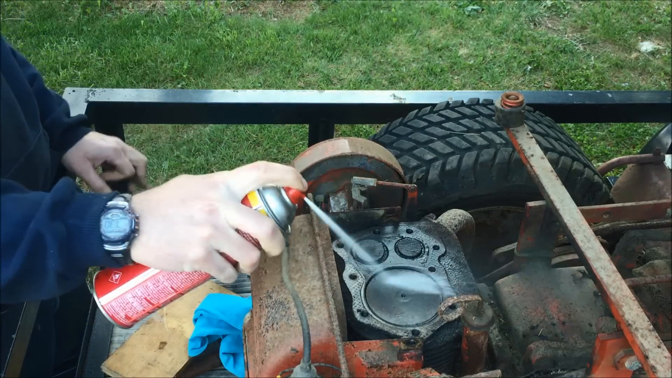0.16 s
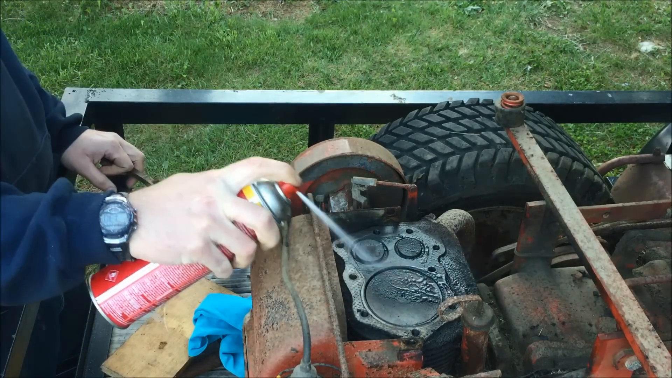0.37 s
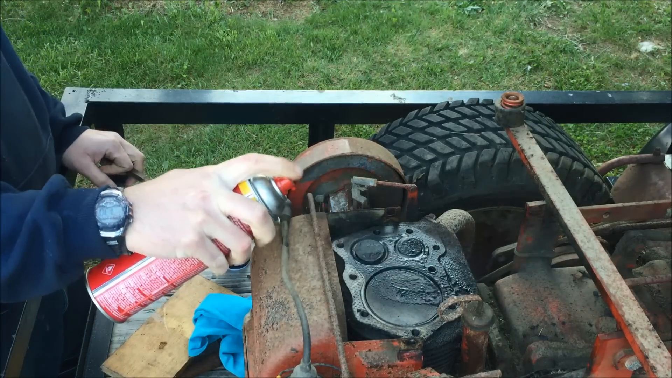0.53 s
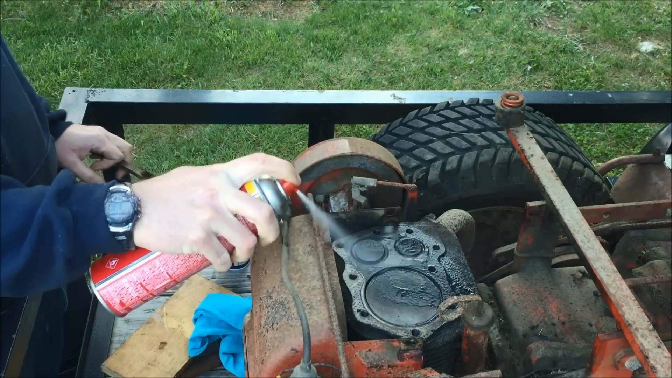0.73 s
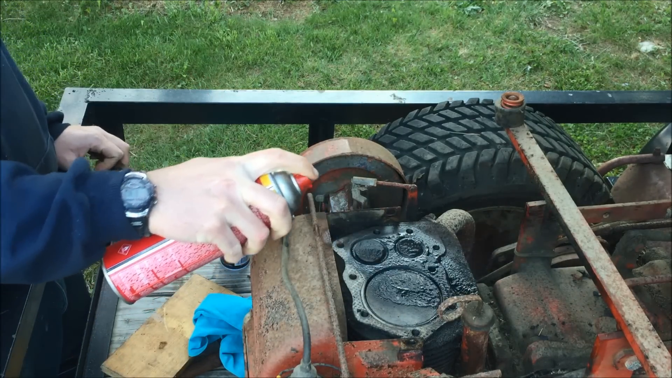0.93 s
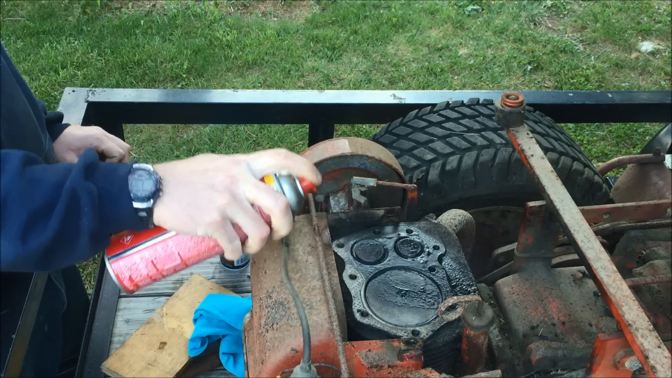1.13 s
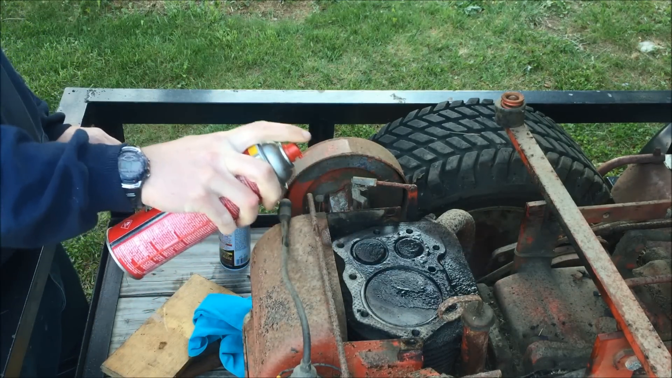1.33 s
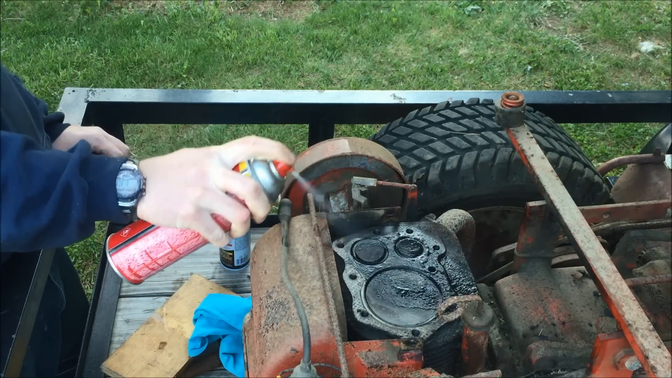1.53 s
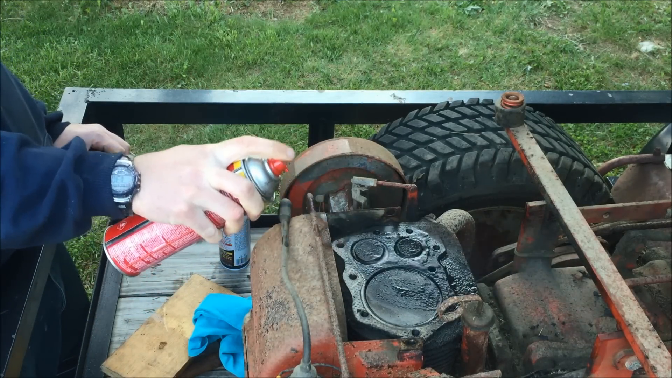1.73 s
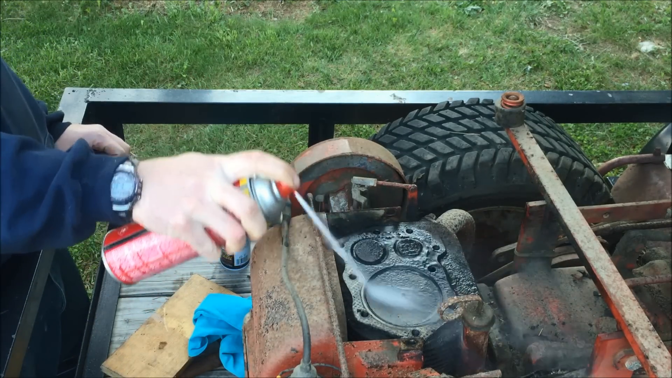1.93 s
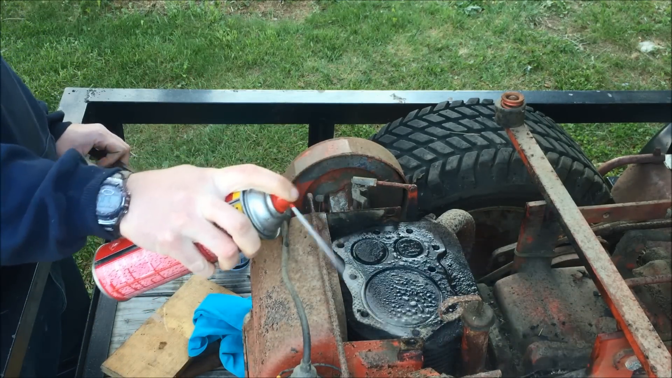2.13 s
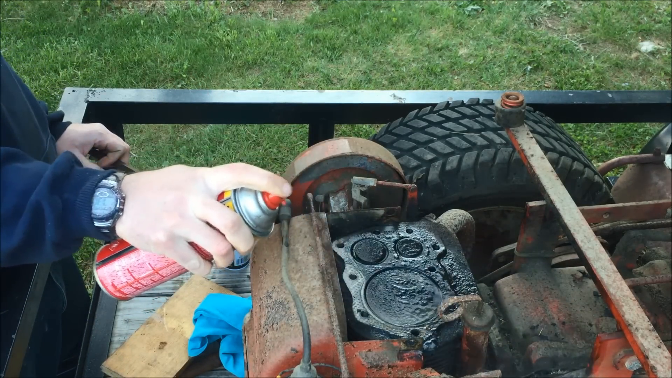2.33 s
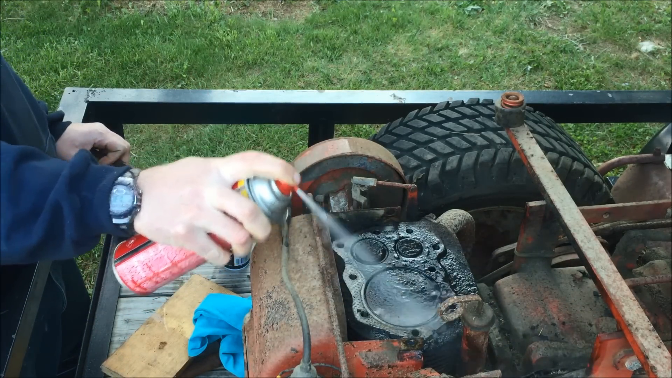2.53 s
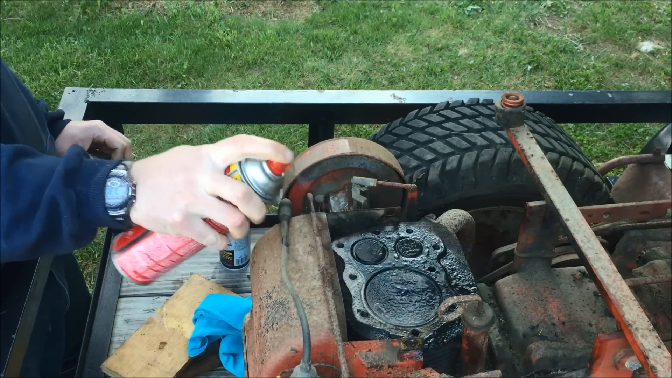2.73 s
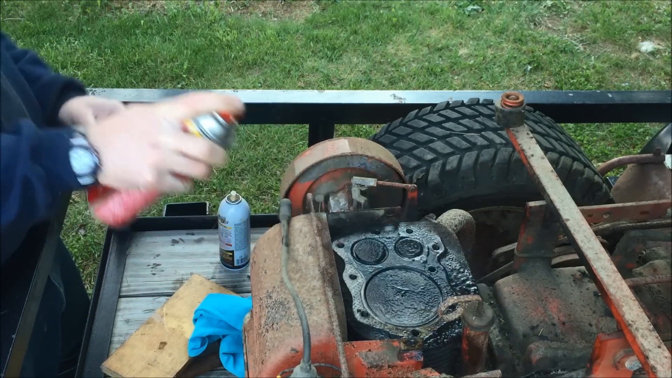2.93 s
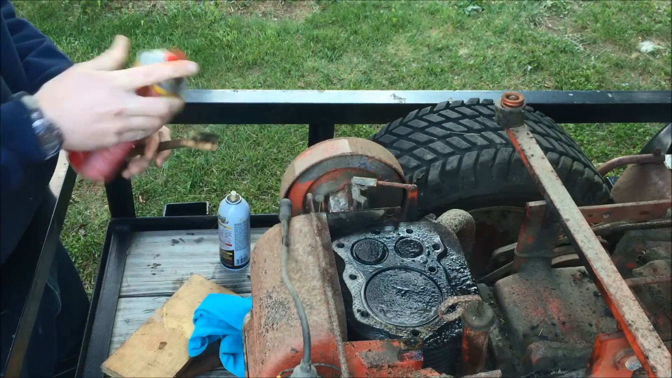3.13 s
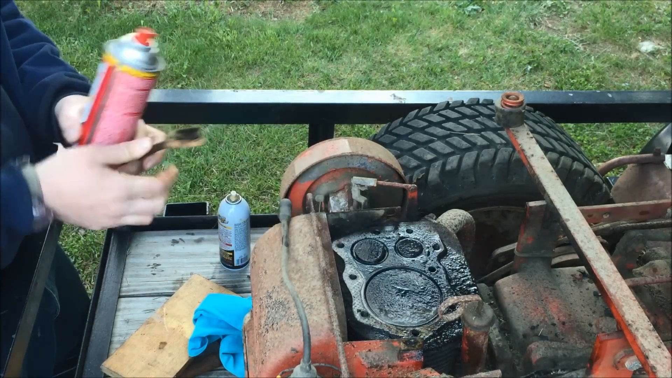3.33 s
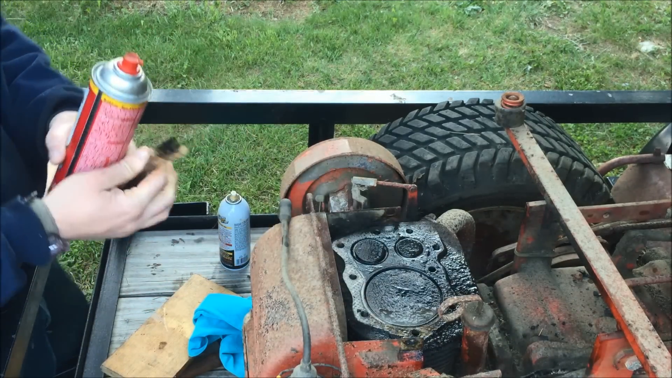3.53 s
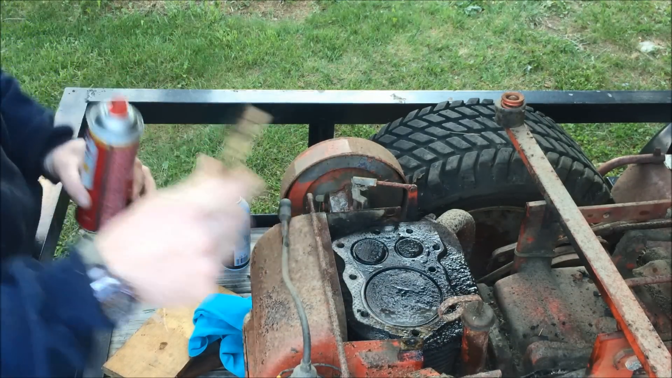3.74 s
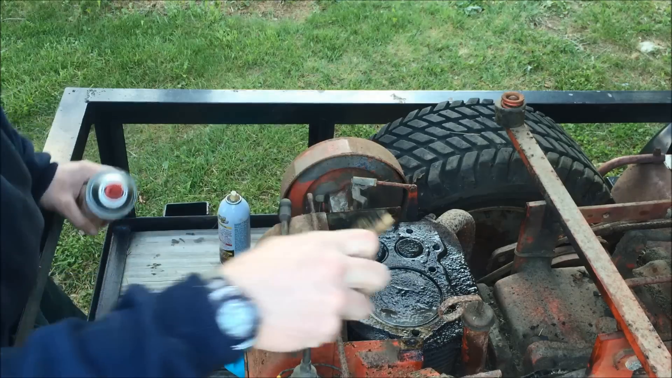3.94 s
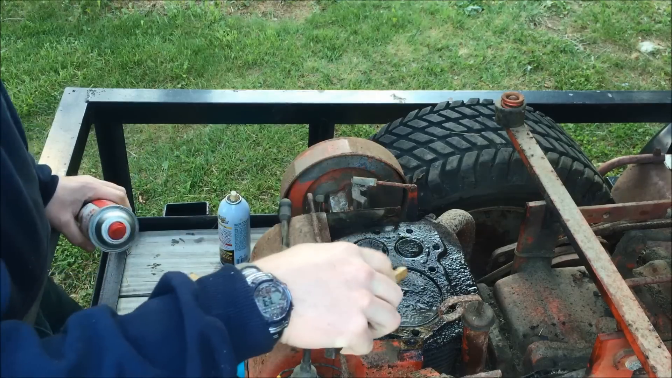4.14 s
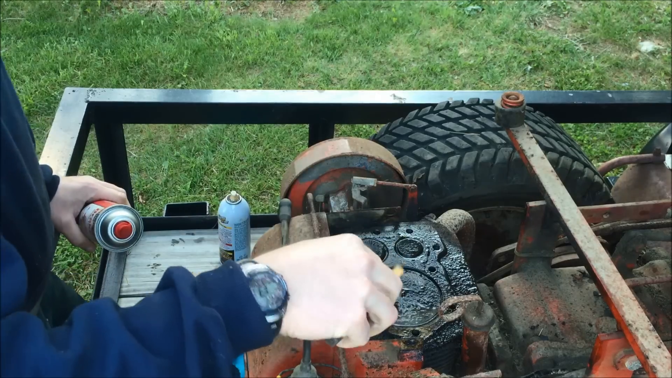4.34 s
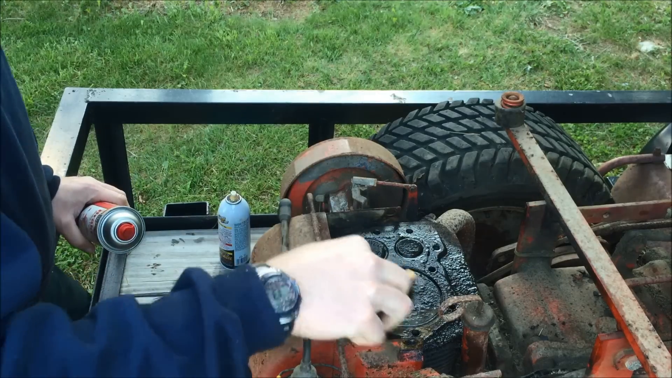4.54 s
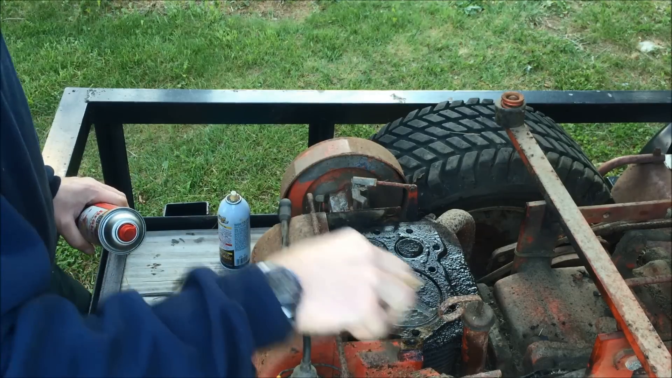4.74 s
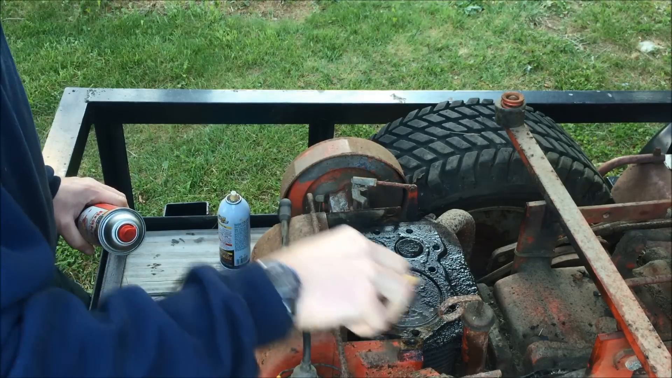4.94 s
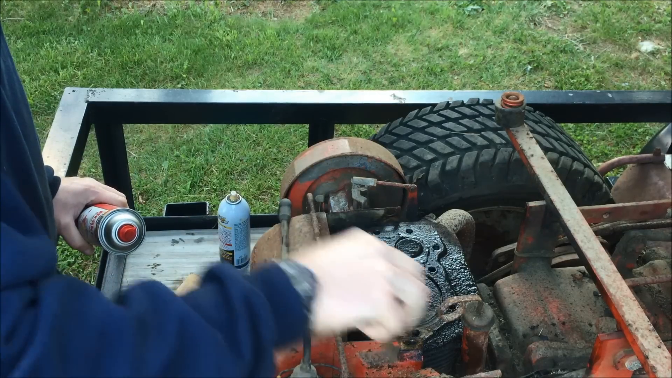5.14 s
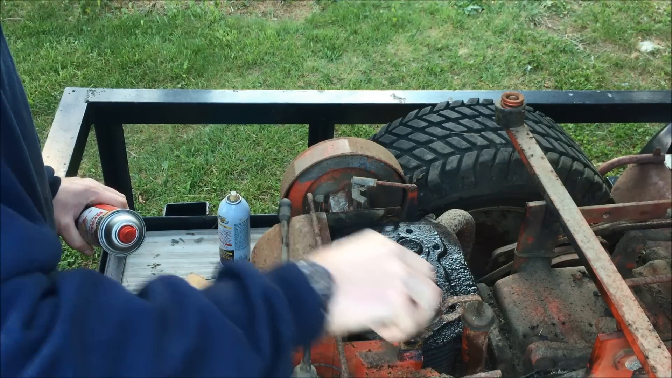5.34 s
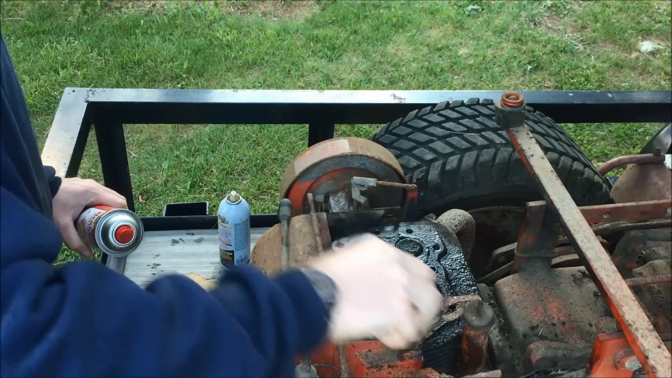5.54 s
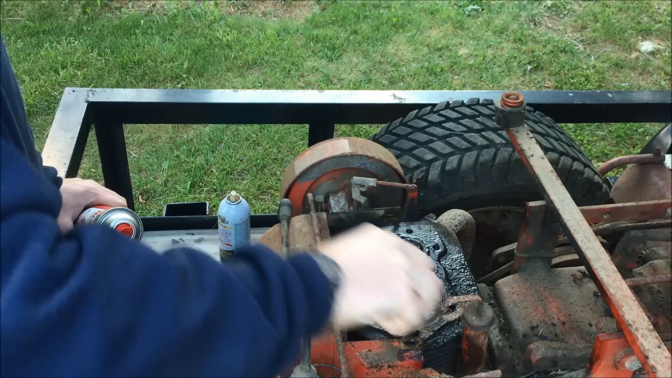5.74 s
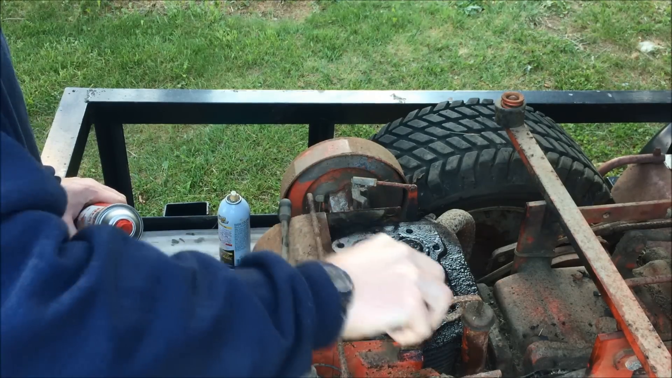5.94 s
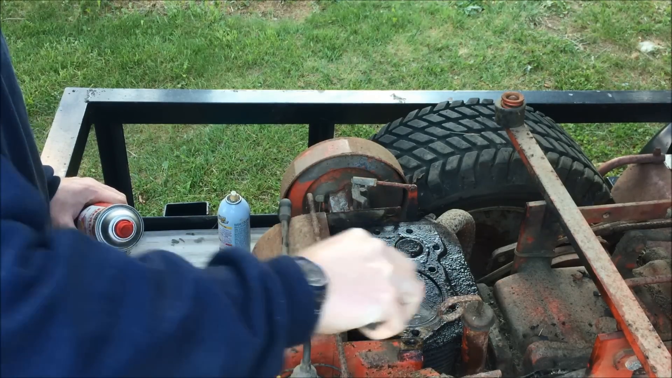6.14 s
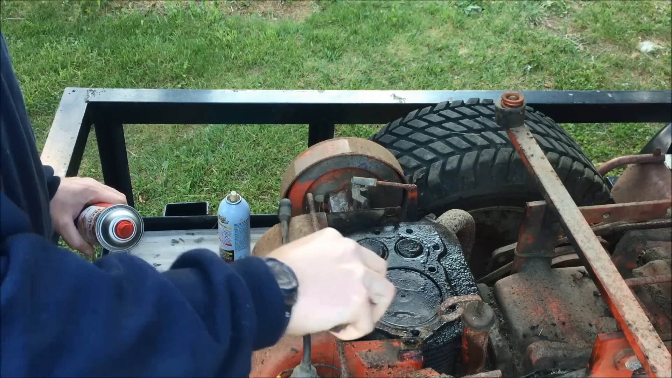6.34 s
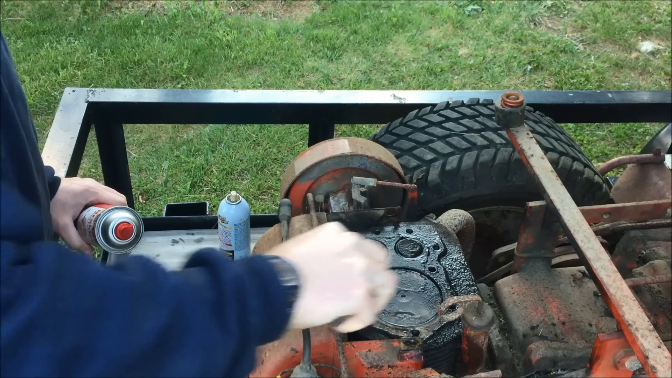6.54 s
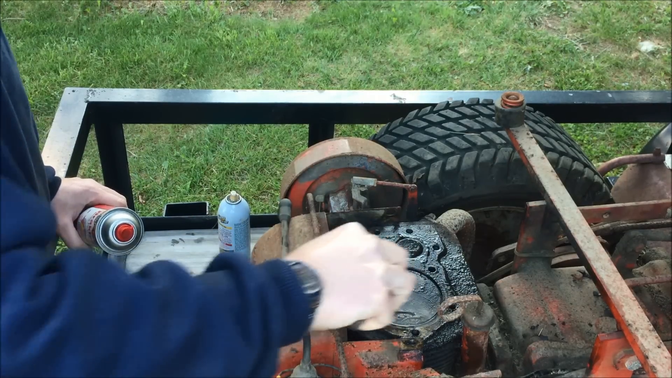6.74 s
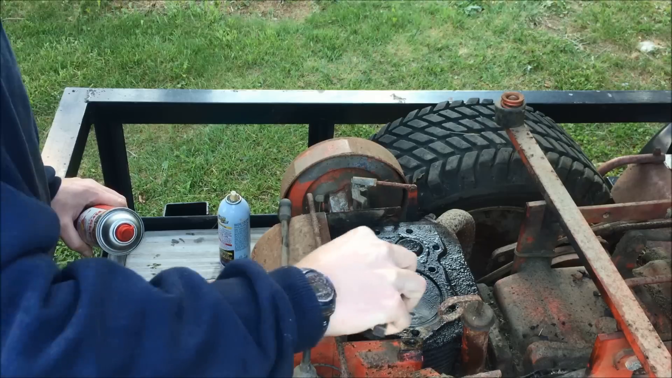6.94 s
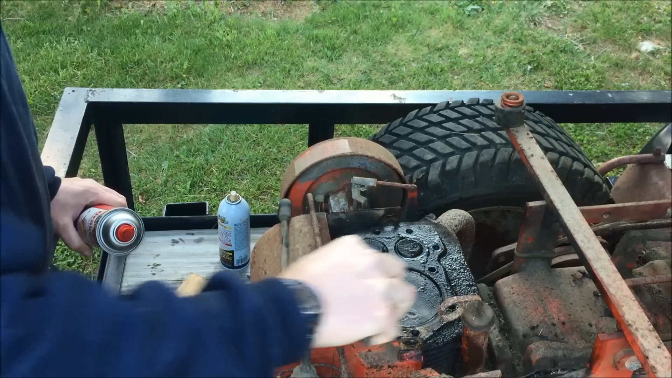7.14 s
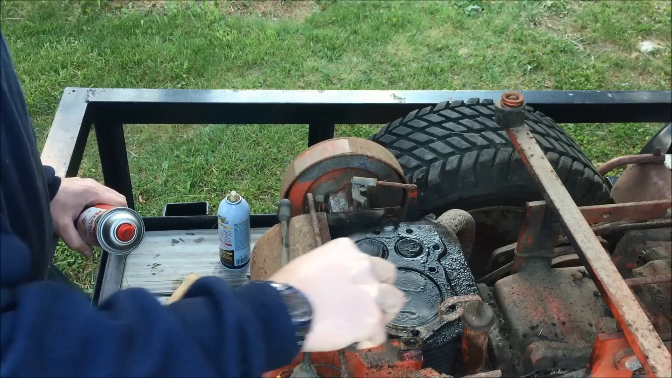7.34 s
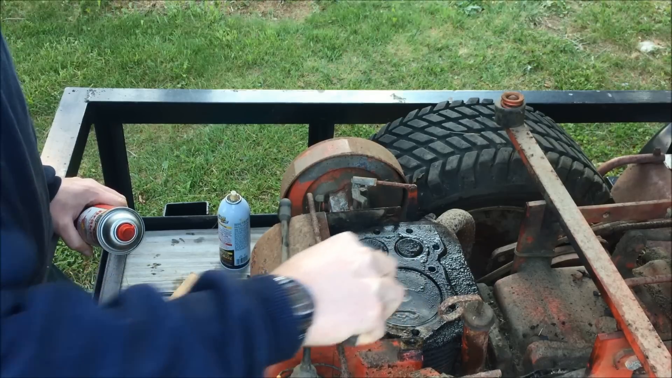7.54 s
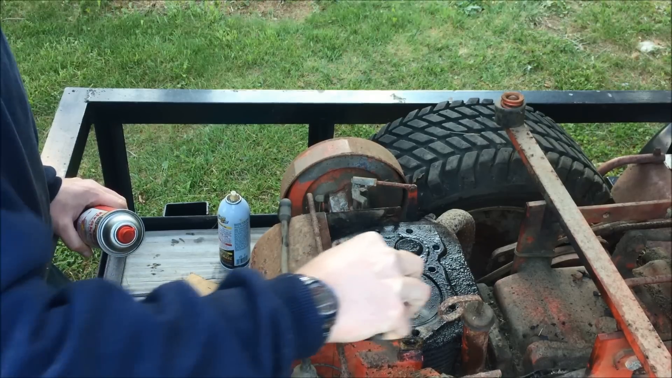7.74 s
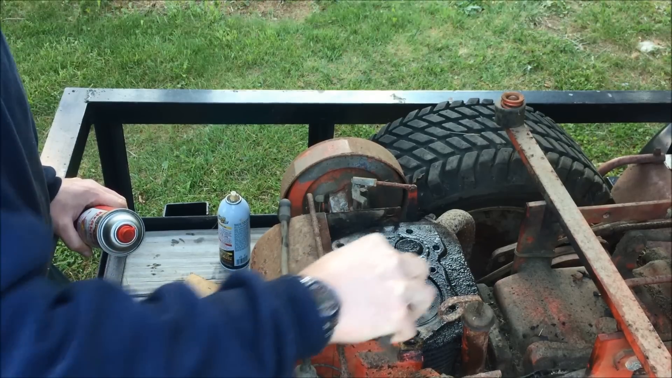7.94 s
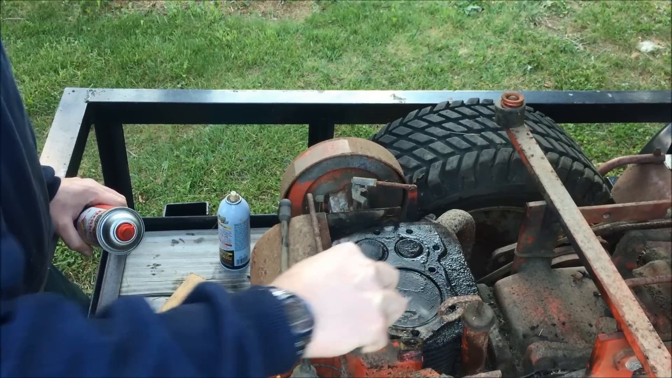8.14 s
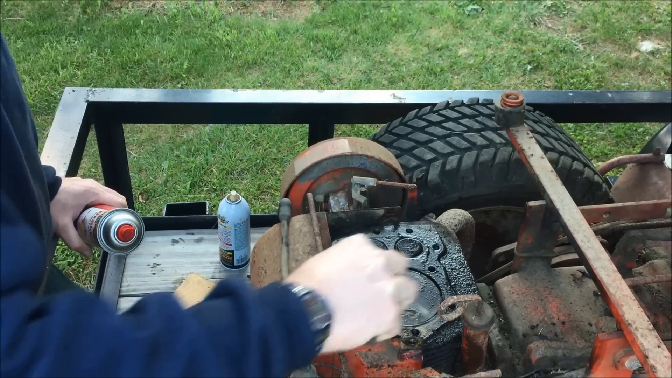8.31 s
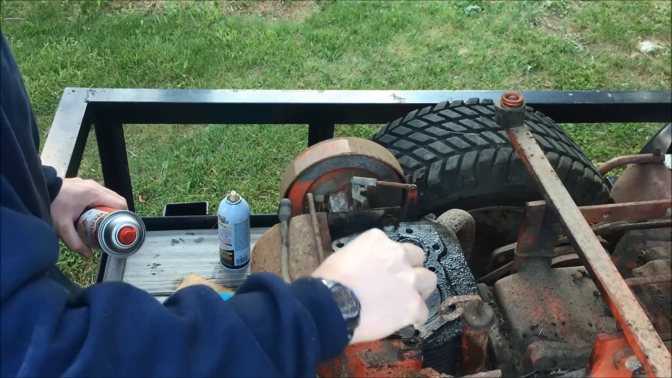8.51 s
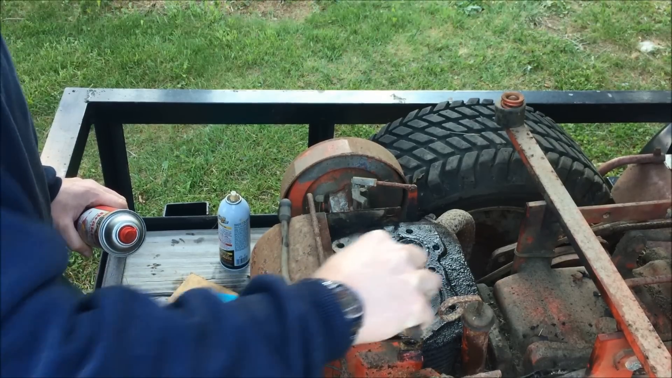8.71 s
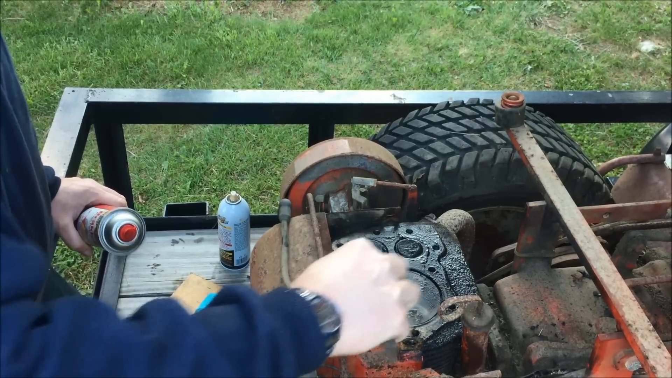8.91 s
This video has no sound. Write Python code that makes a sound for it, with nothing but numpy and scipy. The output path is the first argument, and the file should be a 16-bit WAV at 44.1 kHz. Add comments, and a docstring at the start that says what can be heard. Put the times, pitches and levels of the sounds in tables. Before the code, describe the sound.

Nine short, sharp spray-can blasts hiss onto metal, then a small wire brush scrubs quickly back and forth, outdoors with wind and distant engine drone.

```python
"""Outdoors on a steel trailer a far engine drones and changes speed, traffic washes, wind buffets the
single microphone and a small bird cheeps now and then: shaped noise, sine orders and ringing noise.
First come nine blasts of a spray can on an engine block, noise split into jet, mist, splash and low part.
Taps on the can ring its shell; then a small wire brush scrubs to and fro in dense ticks, and its
wooden back knocks on the block."""
import sys
import numpy as np
from scipy import signal
from scipy.fft import rfft, irfft
from scipy.io import wavfile
from scipy.ndimage import uniform_filter1d

SR = 44100
rng = np.random.default_rng(int(sys.argv[2]) if len(sys.argv) > 2 else 0)


def store_pcm(level_fs):
    """Save levels as 16-bit WAV."""
    pcm = np.round(np.clip(level_fs, -1, 1) * 32767).astype(np.int16)
    wavfile.write(sys.argv[1], SR, np.atleast_2d(pcm).T)


N = 399977
T = np.arange(N) / SR


def amp(db):
    """Decibels to gain."""
    return 10 ** (np.asarray(db) / 20)


def rms_one(x):
    """Scale to unit rms."""
    return x / np.sqrt(np.mean(x ** 2) + 1e-20)


def in_time(rows):
    """Every column after the first, joined by straight lines in time."""
    s, *columns = np.transpose(rows)
    return [np.interp(T, s, column) for column in columns]


def drift(rate_hz):
    """Slow random wander of rms 1: noise through two equal one-pole low-passes, run at SR / 16."""
    r = np.exp(-2 * np.pi * rate_hz * 16 / SR)
    noise = rng.standard_normal(N // 16 + 4002)
    slow = signal.lfilter([1], [1, -2 * r, r * r], noise)[4000:]   # skip the filter's start
    return np.interp(np.arange(N) / 16, np.arange(len(slow)), rms_one(slow))


def coloured(x, spectrum):
    """White input given a spectrum, straight lines in dB over log frequency; rms 1."""
    hz = np.fft.rfftfreq(N, 1 / SR) + 1
    point_hz, point_db = np.transpose(spectrum)
    gain = amp(np.interp(np.log(hz), np.log(point_hz), point_db))
    return rms_one(irfft(rfft(x) * gain, N))


def split(x, edges_hz):
    """Parts of a sound between the edges, lowest first, each of rms 1."""
    parts = []
    for hz in edges_hz:
        low = signal.sosfiltfilt(signal.butter(2, hz, fs=SR, output="sos"), x)
        parts.append(rms_one(low))
        x = x - low
    return parts + [rms_one(x)]


def ring(force, hz, t60):
    """A resonance: a unit click sets a sine of height 1 ringing, down 60 dB after t60 seconds."""
    r, w = amp(-60 / (t60 * SR)), 2 * np.pi * hz / SR
    return signal.lfilter([0, np.sin(w)], [1, -2 * r * np.cos(w), r * r], force + 1e-18)


def scatter(x, spread_db, t60):
    """Small reflections off nearby metal colour the sound finely; the colour shifts as the hand moves on."""
    echoes = amp(spread_db - 60 * np.arange(600) / (t60 * SR)) * rng.standard_normal((3, 600))
    echoes[:, 0] = 1   # direct sound
    moved = np.linspace(0, 2, len(x))
    out = np.zeros(len(x))
    for k, echo in enumerate(echoes):
        fade = np.cos(np.pi / 2 * np.clip(moved - k, -1, 1)) ** 2.06
        out += fade * signal.fftconvolve(x, echo / np.linalg.norm(echo))[:len(x)]
    return out


# Road loudness. Each row: time in seconds, level in dB before the band offsets.
TRAFFIC_LEVEL = [(0.0, -67), (2.75, -64.5), (3.79, -62), (4.92, -59.5), (6.1, -56), (6.5, -58),
                 (7.02, -56.5), (9.07, -59.5)]
# Road tone. Each row: frequency in Hz, relative level in dB per Hz before the bands are rebalanced.
TRAFFIC_SPECTRUM = [(120, -25.5), (200, 0.5), (333, -9), (372, -9), (455, -16), (786, -16), (846, -15),
                    (1030, -16.5), (1110, -16.5), (1630, -21.5), (2270, -25), (2620, -26), (15700, -40.5)]


def traffic():
    """Tyre roar of a far road, uneven from band to band, fading upward into the hiss of the air."""
    noise = coloured(rng.standard_normal(N), TRAFFIC_SPECTRUM)
    low, body, roar, hiss = split(noise, [400, 800, 2000])
    level_db = in_time(TRAFFIC_LEVEL)[0]
    road = amp(-19 + 4.2 * drift(6.5)) * low
    road += amp(-7 + 2.2 * drift(6)) * body
    road += amp(-4.5 + 2.1 * drift(11)) * roar
    return amp(level_db + 2 * drift(10)) * road + amp(-72.5) * hiss


# Rumble loudness. Each row: time in seconds, level in dB that the gusts swing around.
WIND_LEVEL = [(0.0, -57.5), (.58, -47.5), (1.11, -55.5), (1.72, -50.5), (2.3, -54.5), (2.68, -45),
              (3.03, -58), (3.84, -45), (4.85, -53.5), (5.33, -48), (5.7, -42), (6.05, -46.5), (7.8, -53),
              (8.18, -42), (9.07, -50.5)]
# Rumble tone. Each row: frequency in Hz, relative level in dB per Hz.
WIND_SPECTRUM = [(12, -57.5), (24, -25.5), (35, -11.5), (55, 5), (80, -2.5), (120, -1.5), (190, -14),
                 (260, -27), (400, -55.5), (1500, -98.5)]
# Single buffets. Each row: crest time in seconds, level in dB before the sharp crest is added,
# frequency at the crest in Hz, length in seconds that scales rise, fall and pitch sag.
BUFFETS = [(.47, -28, 126, 0.014), (.97, -39, 151, 0.011), (1.3, -40, 146, 0.027), (2.502, -34, 125, 0.013),
           (2.807, -21, 174, 0.025), (2.8126, -19.5, 400, .0042), (2.815, -10.5, 100, 0.026),
           (3.278, -34, 146, 0.035), (3.863, -30, 109.6, 0.085), (4.068, -43.5, 250.3, 0.023),
           (5.923, -25, 153, 0.036), (5.943, -21, 138, 0.0068), (6.139, -31.5, 109.6, 0.046),
           (6.248, -31, 70, 0.028), (7.007, -34, 197, 0.021), (7.017, -23.5, 70, 0.05),
           (7.142, -38, 115, .049), (8.904, -27, 146, .015), (8.92, -25, 78.3, 0.049),
           (9.009, -32.5, 54.6, 0.037)]
BUFFET_SHARPNESS = 0.16   # share of harmonics at the crest


def wind():
    """Lumpy rumble on the microphone port, with single buffets whose pitch sags and whose crest is sharp."""
    rumble = coloured(rng.standard_normal(N), WIND_SPECTRUM)
    out = rumble * amp(in_time(WIND_LEVEL)[0] + 5.8 * drift(14))
    for crest_s, level_db, hz, length in BUFFETS:
        t = T - crest_s
        shape = np.exp(-(t / np.where(t < 0, 0.17 * length, 0.57 * length)) ** 2)
        phase = 2 * np.pi * hz * t * (1 - 0.37 * np.clip(t / length, -1, 1))
        harmonics = np.cos(2 * phase) + 0.23 * np.cos(3 * phase) + 0.18 * np.cos(4 * phase)
        crest = BUFFET_SHARPNESS * shape ** 3 * harmonics
        out += amp(level_db) * shape * (np.cos(phase) + crest)
    return out


# Engine speed. Each row: time in seconds, firing rate in Hz.
ENGINE_SPEED = [(0, 51.72), (2.5, 51.34), (3.3, 50.28), (3.81, 42.85), (4.6, 42.9), (5.75, 42.38),
                (6.2, 43), (8.08, 43.18), (8.3, 48.36), (8.5, 55.63), (8.85, 56.86), (9.07, 54.5)]
# Engine loudness. Each row: time in seconds, level of order 2 in dB before exhaust and waver,
# tilt toward the higher orders in dB per order.
ENGINE_LEVEL = [(0, -48, -5), (.55, -45, -12), (.7, -63, 8), (1.2, -50, 2.8), (2.5, -46.5, 1.7),
                (2.75, -59, -2), (3.25, -52.5, 8), (3.5, -45, 3.5), (4.25, -46.5, 0.5), (4.6, -44, 0.9),
                (5.75, -46.5, 3.5), (6.1, -71, 9), (6.4, -44.5, 0.8), (6.85, -41.5, -4), (7.1, -53.5, 5),
                (7.45, -44, -1.2), (7.8, -32, -4.5), (8.16, -47.5, 6), (8.3, -33.5, -12.5), (8.5, -49, 6.5),
                (8.85, -40.5, -12), (9.07, -45, -7)]
# What the exhaust lets out. Each row: frequency in Hz, gain in dB.
EXHAUST = [(84, 0.5), (103, 0), (113, 1), (129, -3.5), (154, -5), (165, -10.5), (172, -13.5), (190, -22.5),
           (208, -27.5), (228, -24)]


def engine():
    """Orders 2 to 4 of the firing rate, each as loud as the exhaust lets it out, wavering over the distance."""
    firing_hz = in_time(ENGINE_SPEED)[0]
    level_db, tilt_db = in_time(ENGINE_LEVEL)
    phase = 2 * np.pi * np.cumsum(firing_hz) / SR + 0.15 * drift(4.4)
    out = np.zeros(N)
    for order in range(2, 5):
        exhaust_db = np.interp(order * firing_hz, *np.transpose(EXHAUST))
        order_db = level_db + (order - 2) * tilt_db + exhaust_db + 3.6 * drift(6.8)
        out += np.sqrt(2) * amp(order_db) * np.sin(order * phase)
    return out


# Bird calls. Each row: start in seconds, length in seconds, pitch in Hz, rms level in dB before the fade.
CHEEPS = [(0.086, 0.064, 7950, -67), (3.505, 0.041, 8630, -66.5), (3.896, .03, 7180, -67.5),
          (4.592, 0.073, 7640, -68)]


def bird():
    """Thin rough cheeps: noise in a narrow throat resonance, starting sharply and fading."""
    noise = rng.standard_normal(N)
    out = np.zeros(N)
    for start, length, hz, level_db in CHEEPS:
        fade = (T > start) * np.clip(1 - (T - start) / length, 0, 1) ** 0.66
        out += amp(level_db) * rms_one(ring(noise, hz, t60=0.0044)) * fade
    return out


CRACK_LOSS_DB = 3.5   # for each doubling of the contact beyond a millisecond


def blows(events, modes, ring_db, crack_db, crack_t60, crack_hz, longest_t60):
    """A contact is a rough push, short when hard; it rings every mode, as long as the gripping hand
    allows, and cracks in a puff of noise."""
    out, puffs = np.zeros(N), np.zeros(N)
    for s, strike_db, hardness, contact in events:
        at = round(s * SR)
        force = np.full(SR // 2, 1e-18)
        n = int(contact * SR) + 1
        force[:n] = rng.standard_normal(n) * np.hanning(n + 2)[1:-1]
        force /= np.linalg.norm(force)
        rings = np.zeros(len(force))
        for hz, mode_db, t60 in modes:
            brightness_db = hardness * np.log2(hz / modes[1][0])   # pivots on the second mode
            rings += amp(mode_db + brightness_db) * ring(force, hz, min(t60, longest_t60))
        out[at:at + len(force)] += amp(strike_db + ring_db) * rings[:N - at]
        softness_db = CRACK_LOSS_DB * max(np.log2(contact * 1000 + 1e-9), 0)
        puffs[at] = amp(strike_db + crack_db - softness_db)
    puff = signal.lfilter([1], [1, -amp(-60 / (crack_t60 * SR))], puffs + 1e-18)
    band = signal.butter(2, crack_hz, "band", fs=SR, output="sos")
    return out + puff * rms_one(signal.sosfilt(band, rng.standard_normal(N)))


# Finger and brush on the can. Each row: time in seconds, strike level in dB before the ring and crack
# offsets, hardness in dB per octave, contact in seconds.
CAN_TAPS = [(.289, -35.5, 5, .0078), (2.941, -41.5, 7, .005), (3.31, -38, 6, 0.15),
            (3.3555, -22.5, 2.5, 0.0025), (3.387, -40.5, -10, 0.0017), (3.7574, -52, 8, 0.00083)]
# Modes of the can's shell. Each row: frequency in Hz, relative level in dB, free 60 dB decay in seconds.
CAN_MODES = [(1336, -1, 0.043), (1733, -12, 0.064), (2300, -11, 0.21), (2440, -12.5, 0.23),
             (2654, 5, 0.0093), (3170, -16, .12), (4250, -13, 0.12), (6100, -12.5, 0.026)]


def can_taps():
    """Light contacts ring the shell of the held can."""
    return blows(CAN_TAPS, CAN_MODES, ring_db=-11.5, crack_db=-4, crack_t60=0.028,
                 crack_hz=[1200, 7000], longest_t60=0.07)


# Wooden brush back on the block. Each row: time in seconds, strike level in dB before the ring and crack
# offsets, hardness in dB per octave, contact in seconds.
KNOCKS = [(4.045, -44, 2.5, 0.053), (4.453, -46, -4, 0.016), (5.16, -51, 2.2, 0.028),
          (5.427, -40, -5, 0.023), (5.834, -37.5, 4.5, 0.0014), (5.842, -36, -2, .0069),
          (6.0185, -32, 11.5, 0.0031), (6.027, -24.5, -8, .008), (6.038, -32, -7, .042),
          (6.1, -37, -7, 0.031), (6.678, -34.5, -6, 0.012), (6.856, -37, -11, 0.011),
          (8.307, -28, -9, 0.013), (8.322, -25, -20, 0.033), (8.574, -31, -20, 0.011),
          (8.898, -53, 1, 0.0024)]
# Modes of the wooden back. Each row: frequency in Hz, relative level in dB, free 60 dB decay in seconds.
HANDLE_MODES = [(527, -24.5, 0.034), (749, -19, 0.033), (1000, -3, 0.078), (1250, -1.5, 0.061),
                (1745, 2, 0.01), (2160, -4, 0.0045), (3334, -20.5, 0.019)]


def handle_knocks():
    """Knocks ring the wooden back of the held brush."""
    return blows(KNOCKS, HANDLE_MODES, ring_db=-3.5, crack_db=-7, crack_t60=0.019,
                 crack_hz=[900, 5500], longest_t60=0.04)


# Brush strokes. Each row: fastest moment in seconds, rise in seconds, fall in seconds, level in dB,
# level halfway up in dB against the fastest, dull part in dB against the bright part.
STROKES = [(4.775, 0.068, 0.037, -56, 1.5, -6), (4.879, 0.051, 0.026, -48.5, -13, -4.5),
           (4.985, 0.049, 0.024, -46.5, -.3, -7), (5.068, 0.017, .046, -43.5, -1.5, -5.5),
           (5.195, .052, 0.024, -49.5, 0.5, -4), (5.28, 0.023, 0.038, -43, -3, -9),
           (5.391, 0.039, 0.031, -44.5, -1.5, -7.5), (5.506, 0.038, 0.025, -40.5, -2, -14.5),
           (5.607, .034, 0.026, -42.5, -6, -8.5), (5.717, .037, 0.028, -41.5, -1.5, -8.5),
           (5.808, .028, 0.026, -40, -2, -5.5), (5.908, 0.022, 0.038, -37, -6, -7.5),
           (6.01, 0.034, .029, -40.5, 0.5, -7.5), (6.115, 0.041, 0.029, -40.5, -3, -4),
           (6.243, 0.069, 0.042, -41, -1.5, -9.5), (6.384, 0.08, 0.058, -47, -5.5, -9),
           (6.499, 0.035, 0.057, -41.5, -2, -6), (6.647, 0.053, 0.03, -43.5, -8.5, -2.5),
           (6.755, 0.029, 0.049, -41.5, -2, -7), (6.901, 0.063, 0.033, -45.5, -6.5, -4.5),
           (7.008, 0.033, 0.039, -40.5, -3.5, -12.5), (7.14, 0.06, 0.026, -46.5, -1, .1),
           (7.239, .024, 0.055, -40.5, -5, -12), (7.398, 0.078, 0.028, -46, -4, -2),
           (7.497, 0.024, 0.064, -43.5, -1.5, -13.5), (7.643, 0.049, 0.021, -38.5, -11.5, 1.5),
           (7.75, 0.038, 0.063, -41, -0.5, -10.5), (7.91, 0.079, 0.026, -43, -7.5, -0.5),
           (8.019, 0.044, 0.051, -46.5, -9, -4.5), (8.176, .076, 0.022, -41, -8, -3.5),
           (8.258, 0.019, 0.083, -41, 1, -4.5), (8.436, 0.054, 0.026, -43.5, -5, -2),
           (8.564, 0.062, .027, -44.5, -1.5, -8.5), (8.708, .076, 0.024, -47, -2, -3.5),
           (8.815, .019, 0.023, -50.5, 2, -5.5), (8.942, 0.046, 0.015, -42, -18.5, .1),
           (9.035, 0.017, 0.031, -43, -3, 0)]
# Bristles and sleeve brushing past. Each row: the same columns as the strokes.
RUSTLES = [(.293, .004, .025, -58, -9, 16), (3.348, 0.048, 0.058, -56, -1, 1),
           (3.61, 0.031, .058, -67.5, -2, -4), (3.9, .03, .03, -72, -4, 0),
           (4.065, 0.043, 0.039, -64.5, -11, 19)]
# Tone of the wire ticks. Each row: frequency in Hz, relative level in dB per Hz before the split.
BRISTLE_SPECTRUM = [(880, -26.5), (1500, -23.5), (2160, -4), (2430, -10), (2790, -6), (3130, -10.5),
                    (3360, -4.5), (4640, -5.5), (6230, -1.5), (8620, 1), (13500, -1.5), (15700, -2.5)]
BRISTLE_TICKS_PER_S, SNAGS_PER_S = 14000, 250
STROKE_EDGE_DB, HALFWAY_DOWN_DB, TURN_DB_PER_S = -10.5, -3.5, 906
DRAG_DB, DRAG_FADE_DB_PER_S = -52, 590   # faint drag that lingers around each stroke
DULL_SWING_DB_PER_S = 196.5   # slow-starting pulls dig in and dull as they go, quick pushes brighten
HANDLE_FROM_BRISTLES_DB = -20


def brush():
    """Dense wire ticks swell with the speed of each stroke and nearly stop at the turns."""
    sizes = amp(1.3 * np.minimum(rng.exponential(1, N), 5)) * rng.choice([-1, 1], N)
    ticks = sizes * (rng.random(N) < BRISTLE_TICKS_PER_S / SR)
    dull, bright = split(coloured(ticks, BRISTLE_SPECTRUM), [7000])
    catch = drift(60)   # tufts catch and let go
    dull = dull * amp(0.34 * catch + 2.6 * drift(40))
    bright = bright * amp(0.57 * catch + 2.54 * drift(40))
    out = np.zeros(N)
    for fastest, rise, fall, level_db, up_db, dull_db in RUSTLES + STROKES:
        near = slice(int((fastest - 0.2) * SR), int((fastest + 0.2) * SR))
        t = T[near] - fastest
        speed_db = np.interp(t, [-rise, -rise / 2, 0, fall / 2, fall],
                             [STROKE_EDGE_DB, up_db, 0, HALFWAY_DOWN_DB, STROKE_EDGE_DB])
        outside = np.maximum(-rise - t, 0) + np.maximum(t - fall, 0)   # seconds beyond the stroke
        gain = amp(level_db + speed_db - TURN_DB_PER_S * outside)
        gain += amp(level_db + DRAG_DB - DRAG_FADE_DB_PER_S * outside)
        swing_db = DULL_SWING_DB_PER_S * (rise - fall) * np.clip(t / (rise + fall), -1, 1)
        dullness = amp(dull_db + swing_db)
        stroke = gain * (bright[near] + dullness * dull[near]) / np.sqrt(1 + dullness ** 2)
        out[near] += scatter(stroke, spread_db=-22, t60=0.028)
    # sparse snags shake the wooden back
    snags = uniform_filter1d(abs(out), size=200) * sizes * (rng.random(N) < SNAGS_PER_S / SR)
    back = sum(amp(mode_db) * ring(snags, hz, t60) for hz, mode_db, t60 in HANDLE_MODES)
    return out + amp(HANDLE_FROM_BRISTLES_DB) * back


# Spray blasts. Each row: moment the valve is fully open in seconds, moment it starts to shut in seconds,
# jet level in dB, then first gasp, mist, splash, low part at first, low part later and can shell, all in
# dB against the jet except the shell, which is in dB against the splash; delay of the bounce off the
# block and of the reversed bounce in milliseconds.
BLASTS = [(0.309, 0.448, -23, -7, -7, -13, -27.5, -30, -48.5, 0.17, 0.41),
          (0.585, 0.709, -26, -6.5, -1.5, -9.5, -25.5, -15.5, -53, 0.26, 0.22),
          (0.854, 0.988, -24.5, -8, -4, -10, -24, -13, -37, 0.26, 0.38),
          (1.2, 1.351, -27, -9, -2.5, -7, -18, -9, -44.5, 0.19, 0.27),
          (1.743, 1.889, -26, -5, -3, -10, -13, -22, -57, 0.21, 0.27),
          (2.055, 2.214, -26.5, -1.5, -3.5, -12, -25, -21.5, -49.5, .243, 0.36),
          (2.361, 2.52, -26.5, -6.5, -2.5, -8.5, -32, -17, -48.5, 0.264, .411),
          (2.681, 2.845, -26, -2.5, -4.5, -8, -26, -22.5, -43, 0.36, 0.4),
          (2.97, 3.117, -27, -2, -4, -6, -33, -19.5, -47, 0.39, .468)]
# Tone of the spray noise. Each row: frequency in Hz, relative level in dB per Hz before the split.
JET_SPECTRUM = [(180, -44.5), (300, -22.5), (493, -13), (643, -10), (895, -11.5), (1150, -15.5),
                (1270, -14), (1980, -12.5), (2150, -11), (3660, -11), (4610, -7), (7580, -4), (12000, 4),
                (15700, 5.5)]
VALVE_OPEN_S, LEAK_S, LEAK_DB = 0.01, 0.019, -25.5   # both ramps end at the fully open moment
VALVE_SHUT_DB_PER_S, DRIBBLE_DB, DRIBBLE_DB_PER_S = 1513, -27, 245
FULL_FLOW_S, EASE_OFF_S, EASE_OFF_DB = 0.021, 0.024, -2   # finger presses home, eases off before the shut
MIST_SAG_DB_PER_S, LOW_SHIFT_S = 19, 0.14   # the mist thins while the low part changes level
BORE_HZ, BORE_T60_S, BORE_DB = 570, 0.017, -32.5   # the hollow above the piston hums under the jet
BOUNCE_SHARE, REVERSED_SHARE = 0.17, 0.23


def spray():
    """Turbulent jet in four parts; it leaks, snaps on, shuts fast and dribbles out; the can's shell sings along."""
    noise = coloured(rng.standard_normal(N), JET_SPECTRUM)
    low, splash, mist, jet = split(noise, [1500, 4500, 9000])
    low = rms_one(low + amp(BORE_DB) * ring(low, BORE_HZ, BORE_T60_S))
    sputter = drift(65)   # droplets make the whole jet flutter
    parts = np.array([part * amp(sputter + 1.8 * drift(31)) for part in (jet, mist, splash, low)])
    out = np.zeros(N)
    for (start, end, jet_db, gasp_db, mist_db, splash_db, low_first_db, low_later_db, shell_db,
         bounce_ms, reversed_ms) in BLASTS:
        near = slice(int((start - 0.05) * SR), int((end + 0.2) * SR))
        t = T[near]
        n = np.arange(len(t))
        flow_db = jet_db + np.interp(t, [start, start + FULL_FLOW_S, end - EASE_OFF_S, end],
                                     [gasp_db, 0, 0, EASE_OFF_DB])
        low_db = np.interp(t, [start, start + LOW_SHIFT_S], [low_first_db, low_later_db])
        thinning_db = mist_db - MIST_SAG_DB_PER_S * (t - start)
        against_jet_db = np.array([0 * t, thinning_db, splash_db + 0 * t, low_db])

        snap = np.clip((t - start) / VALVE_OPEN_S + 1, 0, 1) ** 2
        leak = amp(LEAK_DB) * np.clip((t - start) / LEAK_S + 1, 0, 1)
        after = np.maximum(t - end, 0)
        closing = amp(-VALVE_SHUT_DB_PER_S * after) + amp(DRIBBLE_DB - DRIBBLE_DB_PER_S * after)
        layers = parts[:, near] * np.maximum(snap, leak) * closing * amp(flow_db + against_jet_db)

        direct = layers.sum(axis=0)
        bounce = BOUNCE_SHARE * np.interp(n - bounce_ms * SR / 1000, n, direct)
        reversed_bounce = REVERSED_SHARE * np.interp(n - reversed_ms * SR / 1000, n, direct)
        shell = sum(amp(shell_db + mode_db) * ring(layers[2], hz, t60)   # driven by the splash layer
                    for hz, mode_db, t60 in CAN_MODES)
        out[near] += scatter(direct + bounce - reversed_bounce, spread_db=-21, t60=0.033) + shell
    return out


def scene():
    """All sources at one microphone, copied to both channels."""
    background = traffic() + wind() + engine() + bird()
    work = can_taps() + handle_knocks() + brush() + spray()
    return np.tile(background + work, (2, 1))


def record(dry):
    """A steep low-pass cuts the top above 15.8 kHz."""
    return signal.sosfilt(signal.ellip(12, 0.5, 75, 15800, fs=SR, output="sos"), dry)


dry = scene()
out = record(dry)
store_pcm(out)
```